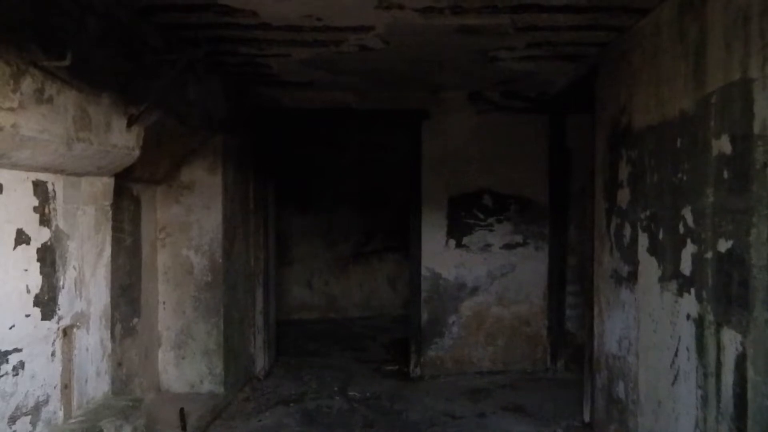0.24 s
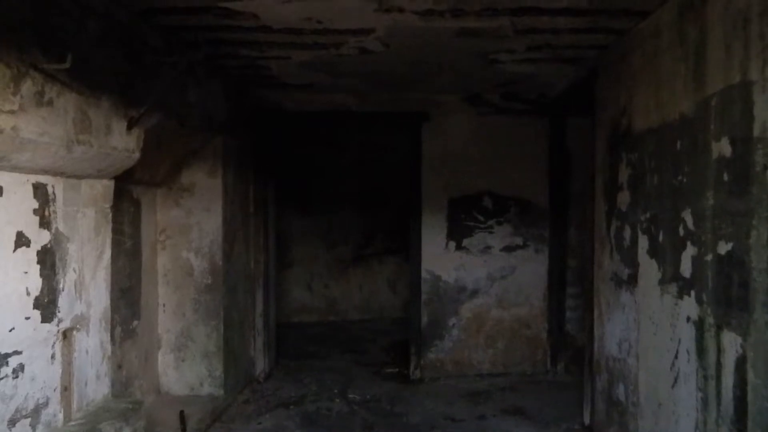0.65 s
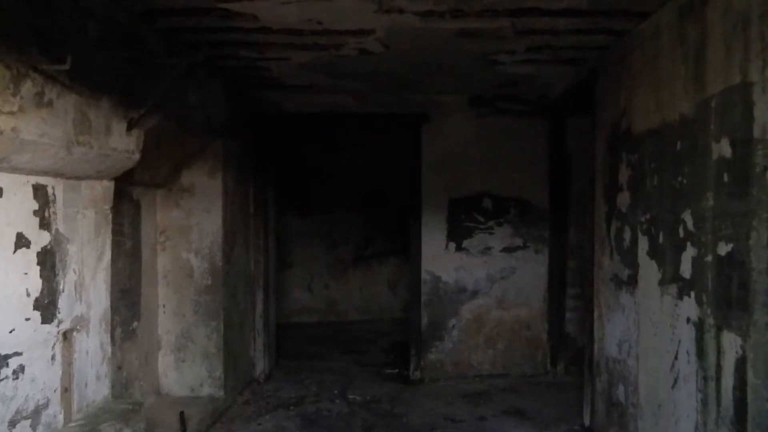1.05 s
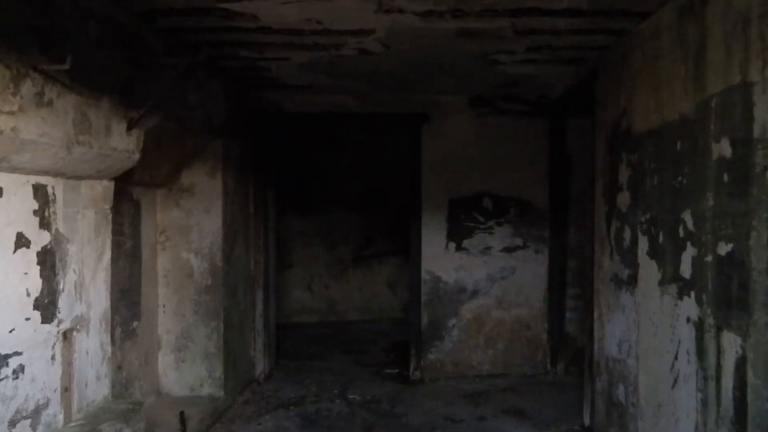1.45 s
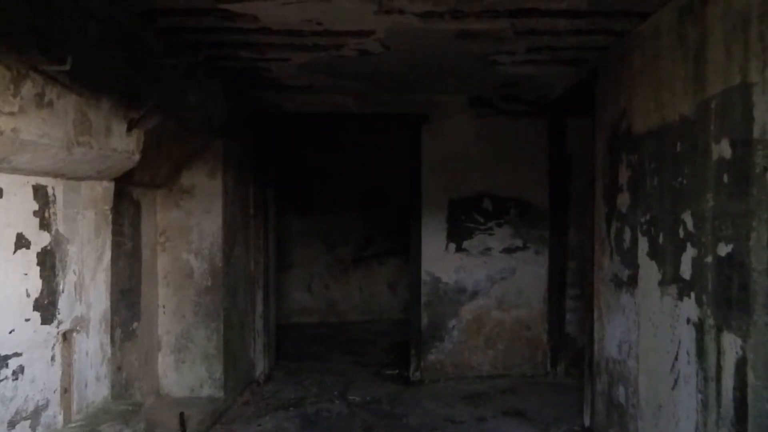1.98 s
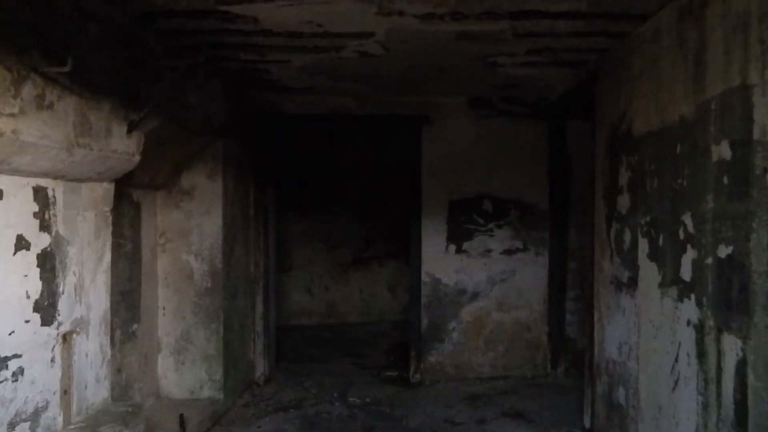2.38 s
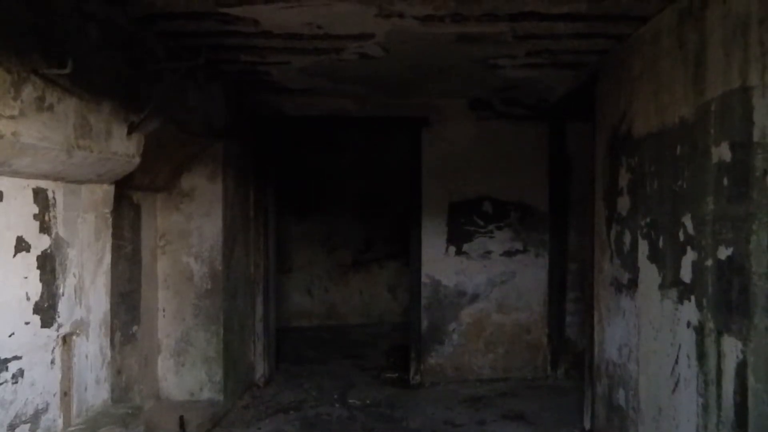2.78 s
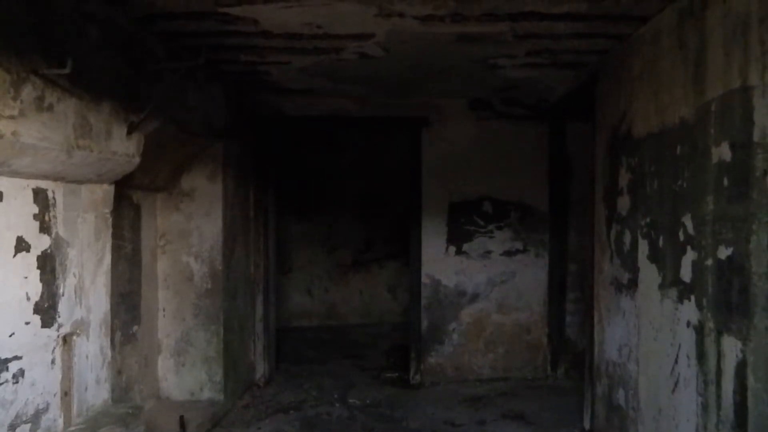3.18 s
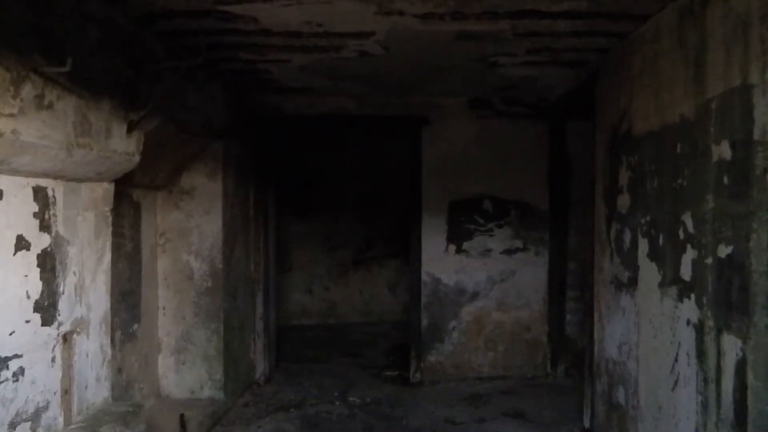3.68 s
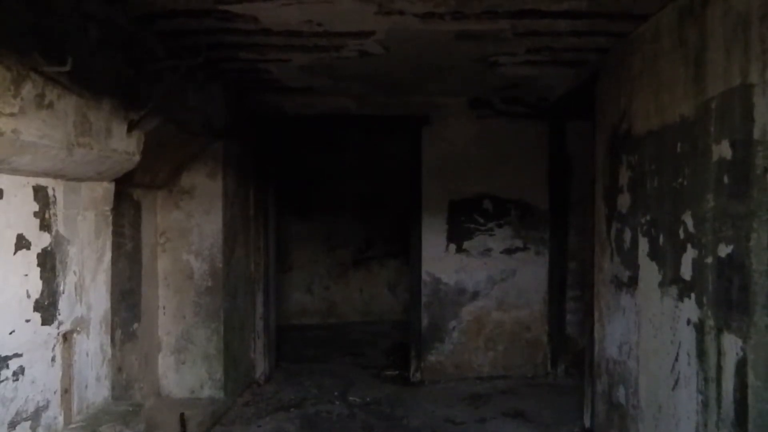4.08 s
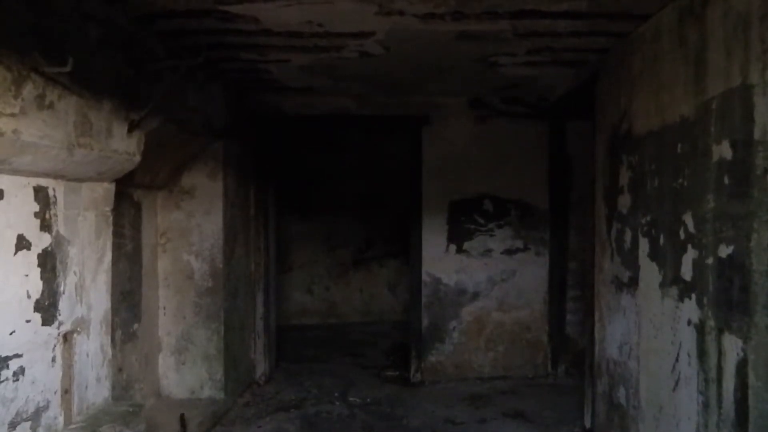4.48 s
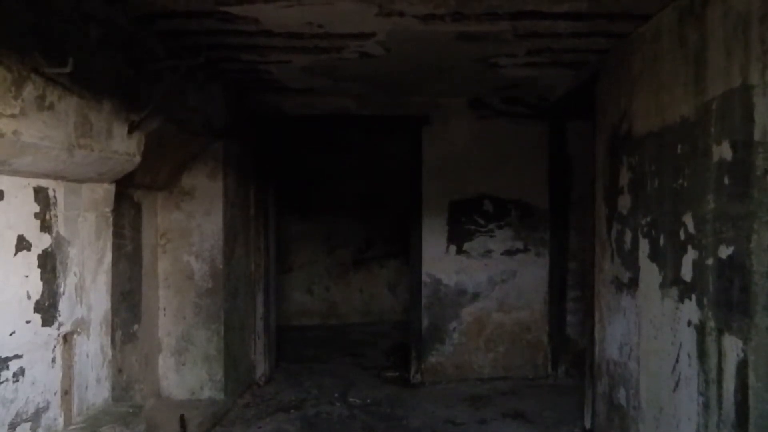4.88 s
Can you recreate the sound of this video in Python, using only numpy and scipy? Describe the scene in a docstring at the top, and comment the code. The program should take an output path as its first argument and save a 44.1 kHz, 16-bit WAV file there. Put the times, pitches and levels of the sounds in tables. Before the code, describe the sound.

Swallows squabble in harsh, raspy squawks inside an echoing concrete bunker, over a faint, distant engine hum.

```python
"""Inside a bare concrete bunker, swallows squabble. Each squawk is a raspy harmonic series from the two
sides of the syrinx, mixed with turbulent air and filtered by throat and beak; its pitch dips, then whips
upward. The walls add early reflections and a short reverberant ring. Wings flick now and then, there is
one soft scuff, and a far engine hums in the outdoor air."""
import sys
import numpy as np
from scipy import signal
from scipy.fft import rfft, irfft, next_fast_len
from scipy.io import wavfile
from scipy.ndimage import uniform_filter1d

SR = 44100
rng = np.random.default_rng(int(sys.argv[2]) if len(sys.argv) > 2 else 0)


def transcribe(u):
    """Save the signal u as a 16-bit wav file named by the first command-line argument.

    u: samples, shape (n,) or (channels, n), limited to [-1, 1]; the rate is SR.
    q: integer samples, one column per channel.
    """
    v = np.clip(np.atleast_2d(u).T, -1, 1)
    q = np.round(v * 32767).astype(np.int16)
    wavfile.write(sys.argv[1], SR, q)


N = 226612
TIME = np.arange(N) / SR
RUN_IN = SR // 2   # samples: the bunker is already ringing when the scene opens
CUTOFF_HZ = 15750
MIN_FFT_SIZE = 8192


def swallows(perches=3):
    """Superposition: the squawks come from the perches in turn and add up in one row for each."""
    # calls: peak_time_s, top_pitch_hz, rasp (0 to 1), level_db, gape_db, treble_db
    squawks = [(-.14, 1706, 0.37, -24.5, -1.5, -18), (.593, 1876, 0.62, -19, 0, -10),
               (.685, 1773, 0.26, -26, -13, -28), (.781, 1768, 0.65, -26.5, -13.5, -18),
               (.944, 1863, 0.22, -17, -5.5, -4), (1.039, 1682, 0.28, -18, -8.5, -12.5),
               (1.106, 1762, 0.52, -24, -13, -24), (1.198, 1740, 0.62, -24.5, -15, -31),
               (1.295, 1802, 0.56, -24, -17, -10), (1.41, 1844, 0.8, -26.5, -14, -28),
               (1.552, 1863, 0.73, -25, -19, -6), (1.663, 1812, 1, -23, -13, -34),
               (1.691, 1522, 0.62, -26, 2, -27), (1.766, 1812, 0.98, -24, -2.5, -10),
               (2.011, 2161, 0.21, -15.5, -10, 3.5), (2.11, 1942, .15, -18, -3, 0),
               (2.174, 1144, 0.4, -34, 21, 12), (2.422, 1742, 0.48, -21, -12, -12.5),
               (2.474, 1880, 0.19, -15.5, -7.5, -4.5), (2.498, 1702, 0.9, -21.5, -27, -17),
               (2.565, 1714, 0.33, -15.5, -9, -11.5), (2.829, 1546, 0.57, -19.5, -2.5, -19),
               (2.906, 1368, 0.82, -25.5, -1, -28), (3.169, 1647, 0.47, -21.5, -15.5, -20),
               (3.271, 1578, 0.47, -27.5, -9.5, -18), (3.524, 1540, .45, -19.5, -2, -22),
               (3.885, 1143, 0.49, -29.5, 11, -2), (4.011, 1656, 0.64, -25, -11.5, -13),
               (4.103, 1570, 0.37, -24.5, -11, -21), (4.168, 1694, 0.47, -16.5, -4, -21),
               (4.251, 1496, 0.35, -18.5, -4.5, -19), (4.578, 1683, .7, -13.5, -7.5, -9),
               (4.663, 1622, 0.28, -16, -10.5, -16), (4.685, 1518, 0.44, -21, -5.5, -13),
               (4.955, 1609, 0.47, -14.5, -4.5, -23), (5.056, 1216, 0.66, -26.5, 2, -9)]
    rows, last_s = np.zeros((perches, RUN_IN + N + SR)), -np.inf
    for k, (peak_s, top_hz, rasp, level_db, gape_db, treble_db) in enumerate(squawks):
        lead_s, call = articulate(peak_s - last_s, top_hz, rasp, gape_db, treble_db)
        start = RUN_IN + int((peak_s - lead_s) * SR)
        rows[k % perches, start:start + len(call)] += from_db(level_db) * call
        last_s = peak_s
    return rows[:, :RUN_IN + N]


def articulate(pause_s, top_hz, rasp, gape_db, treble_db, usual_top_hz=1700, usual_dip_hz=1322):
    """Covariation: a higher call scoops wider and longer; the pause sets its lead-in, the gape its tone."""
    # a call from rest swells slowly, one hard after another bursts in: pause_s, lead_s, level_db
    lead_ins = [(.025, .031, 3), (.08, .046, 0), (.12, .052, -2.5), (0.299, .059, -5.5)]
    pauses, leads, levels = np.transpose(lead_ins)
    height = top_hz / usual_top_hz
    lead_s = np.interp(pause_s, pauses, leads) * height ** 1.6
    lead_db = np.interp(pause_s, pauses, levels) + .25 * gape_db   # a nearly shut beak muffles it
    dip_hz = min(usual_dip_hz * height ** .5, .85 * top_hz)   # even the lowest grunt dips
    hiss_share = 1.62 * from_db(.2 * gape_db)   # a wider beak lets out more torn air
    return lead_s, squawk(lead_s, dip_hz, top_hz, rasp, lead_db, beak(gape_db, treble_db), hiss_share)


def squawk(lead_s, dip_hz, top_hz, rasp, lead_db, harmonics_db, hiss_share,
           whip_s=.03, release_s=.017, second_ratio=1.26, second_share=.67):
    """Biphonation: two voices and hiss sag in pitch, whip up to a clearer peak, then hook down."""
    t = np.arange(-lead_s, release_s, 1 / SR)
    rise_s = min(whip_s, .6505 * lead_s)
    glide_times = [-lead_s, -.5 * (lead_s + rise_s), -rise_s, -.58 * rise_s, -.1 * rise_s,
                   .2 * release_s, release_s]
    glide = np.interp(t, glide_times, [.562, .18, .05, .24, .94, 1, .9])
    pitch = dip_hz + (top_hz - dip_hz) * uniform_filter1d(glide, size=260, mode="nearest")
    effort_times = [-lead_s, -.72 * lead_s, -.55 * rise_s, -.1 * rise_s, .16 * release_s, release_s]
    effort_db = np.interp(t, effort_times, [lead_db - 13, lead_db - 8, lead_db + .49, 1, -2.5, -20])
    onset = np.minimum((t + lead_s) / .0051, 1)   # the air takes a moment to start
    harshness = rasp ** 1.09 * np.interp(t, [-lead_s, -rise_s, 0], [2.9, 1.6, .7])
    # the two lowest harmonics fill in as the throat swells; in a clear call they bloom in the dip
    lowest = np.arange(len(harmonics_db))[:, None] < 2
    bloom_db = 12 * max(1 - 2 * rasp, 0)
    fill_db = np.interp(t, [-lead_s, -.66 * lead_s, -.45 * rise_s], [-13, bloom_db, 0])
    colour_db = harmonics_db[:, None] + lowest * fill_db
    second_side = second_share * harshness * syrinx(pitch * second_ratio, 1.74 * rasp, colour_db)
    hiss = hiss_share * harshness * torn_air(len(t))
    first_side = syrinx(pitch, rasp, colour_db)
    power = 1 + (second_share ** 2 + hiss_share ** 2) * harshness ** 2
    return (first_side + second_side + hiss) / np.sqrt(power) * from_db(effort_db) * onset


def syrinx(pitch, rasp, harmonics_db, flutter=.0066, jitter=.0475, jitter_hz=420, shimmer_hz=280):
    """Quasi-periodic vibration: one side gives harmonics whose jitter and shimmer grow with the rasp."""
    size = len(pitch)
    unsteady_hz = pitch * (1 + (flutter + jitter * rasp) * wander(jitter_hz, size))
    phase = 2 * np.pi * np.cumsum(unsteady_hz) / SR
    order = 1 + np.arange(len(harmonics_db))[:, None]
    gains = from_db(harmonics_db) * (order * pitch < CUTOFF_HZ)
    stack = np.sum(gains * np.sin(order * phase + rng.uniform(0, 2 * np.pi, order.shape)), axis=0)
    shimmer_db = 4 * rasp * wander(shimmer_hz, size)
    return rms_one(stack * from_db(shimmer_db))


def torn_air(size, puff_hz=660):
    """Turbulence: air torn by the membranes gives broadband noise in slight, rapid puffs."""
    # turbulence spectrum: frequency_hz, density_db
    spectrum = [(1200, -20.5), (2500, -13.5), (3700, 1), (5100, -8), (6200, -3), (7600, -5.5),
                (10000, -18.5), (15000, -5)]
    return rms_one(coloured_noise(spectrum, size) * from_db(.59 * wander(puff_hz, size)))


def beak(gape_db, treble_db, slope_db=-2.5):
    """Resonance tracking: the beak stays tuned to harmonic 3; gives nine harmonics in dB against it."""
    upper_db = max(gape_db - 4.5, -10)   # harmonics 4 and 5 still pass a nearly shut beak
    first_five_db = [gape_db - 14, gape_db - 2, 0, upper_db - 4, upper_db - 3]
    return np.concatenate([first_five_db, treble_db + slope_db * np.arange(4)])


def throat(source):
    """Source-filter principle: the windpipe passes little below its first resonance and dulls the top."""
    # windpipe response: frequency_hz, gain_db
    response = [(1000, -16), (1400, -14.5), (1650, -12.5), (2100, -11.5), (2420, -6.5), (2750, 0),
                (3800, -0.5), (4700, -1.5), (5400, 2), (6500, -2.5), (7800, -6.5), (8600, -8.5),
                (11000, -14.5), (15500, -24.5)]
    padded = next_fast_len(len(source), True)
    gains = from_db(at_hz(response, np.fft.rfftfreq(padded, 1 / SR)))
    return irfft(rfft(source, padded) * gains, padded)[:len(source)]


def bunker(source, echo_db=1.0, echo_span_s=.035, echo_count=16, ring_db=-.5, build_up_s=.006):
    """Reverberation: direct sound, near-wall reflections, then a dense ring whose treble dies sooner."""
    # reverberation time by band: centre_hz, t60_s
    decays = [(300, 1), (1500, 0.76), (3000, 0.41), (5000, 0.44), (8000, 0.32), (15000, 0.24)]
    t, hz = TIME[:SR], np.fft.rfftfreq(SR, 1 / SR)
    white = rfft(rng.standard_normal(SR))
    centres_hz, t60s = np.transpose(decays)
    ring = np.zeros(SR)
    for share, t60_s in zip(np.eye(len(decays)), t60s):
        band = at_hz(np.column_stack([centres_hz, share]), hz)
        ring += irfft(white * band, SR) * np.exp(-np.log(1000) * t / t60_s)
    ring *= 1 - np.exp(-t / build_up_s)
    delays_s = (np.arange(echo_count) + rng.uniform(.3, 1, echo_count)) / echo_count * echo_span_s
    echoes = np.zeros(SR)
    # longer paths arrive weaker
    echoes[(delays_s * SR).astype(int)] = rng.choice([-1, 1], echo_count) / (delays_s + .0023)
    response = from_db(ring_db) * ring / np.linalg.norm(ring)
    response += from_db(echo_db) * echoes / np.linalg.norm(echoes)
    response[0] += 1   # direct sound
    return signal.fftconvolve(source, response)[:len(source)]


def wings():
    """Friction noise: feathers rub in brief, bright flicks."""
    # wing flicks: peak_time_s, level_db, width_s
    flicks = [(.146, -39, 0.0064), (.628, -29.5, 0.0049), (1.254, -35.5, 0.0059), (1.283, -34.5, 0.011),
              (4.556, -35.5, 0.023)]
    # feather spectrum: frequency_hz, density_db
    spectrum = [(500, -14), (2000, -7.5), (4000, 1.5), (7000, 6.5), (10000, -1), (15000, -9)]
    return swishes(flicks, spectrum)


def scuff():
    """Friction noise: one soft, low rub."""
    # the rub: peak_time_s, level_db, width_s
    rubs = [(4.345, -47.5, 0.051)]
    # its spectrum: frequency_hz, density_db
    spectrum = [(100, -10), (220, -9), (350, -5.5), (700, -20), (2000, -17), (15000, -31)]
    return swishes(rubs, spectrum)


def engine(sway=.006, sway_hz=1.5, throb_db=-.14, throb_hz=3.3):
    """Engine orders: low tones locked to one wandering speed, each wavering a little in level."""
    # tones of the far engine: frequency_hz, level_db
    orders = [(69.5, -57), (102, -87), (136.5, -47.5), (201, -73)]
    turning = np.cumsum(1 + sway * wander(sway_hz, N)) / SR
    return sum(from_db(db + throb_db * wander(throb_hz, N)) * np.sqrt(2) * np.sin(2 * np.pi * hz * turning)
               for hz, db in orders)


def outdoor_air(level_db=-48.5):
    """Ambient noise: a steady floor, strongest in the bass."""
    # outdoor spectrum: frequency_hz, density_db
    spectrum = [(25, -2), (45, 2), (58, -11), (80, -2), (120, -0.5), (160, -2.5), (230, -9.5), (390, -13),
                (600, -17.5), (1100, -20), (2200, -24.5), (5700, -24), (13000, -29.5), (15500, -35)]
    return from_db(level_db) * coloured_noise(spectrum)


def swishes(events, spectrum):
    """Amplitude modulation: Gaussian swells shape a rubbing noise."""
    swell = sum(from_db(db) * np.exp(-.5 * ((TIME - peak_s) / width_s) ** 2)
                for peak_s, db, width_s in events)
    return swell * coloured_noise(spectrum)


def coloured_noise(spectrum, size=N):
    """Spectral shaping: white noise takes on the given spectrum, at about unit power."""
    padded = next_fast_len(max(size, MIN_FFT_SIZE), True)
    gains = from_db(at_hz(spectrum, np.fft.rfftfreq(padded, 1 / SR)))
    return rms_one(irfft(rfft(rng.standard_normal(padded)) * gains, padded))[:size]


def wander(rate_hz, size):
    """Low-pass noise: a smooth random drift of about unit spread, up to about the given rate."""
    padded = next_fast_len(max(size, MIN_FFT_SIZE), True)
    gains = 1 / (1 + (np.fft.rfftfreq(padded, 1 / SR) / rate_hz) ** 4)
    return rms_one(irfft(rfft(rng.standard_normal(padded)) * gains, padded))[:size]


def at_hz(points, hz):
    """Interpolation of a spectrum on a log-frequency axis."""
    freqs, values = np.transpose(points)
    return np.interp(np.log(np.maximum(hz, 1)), np.log(freqs), values)


def from_db(db):
    """Decibels to amplitude ratio."""
    return 10 ** (np.asarray(db) / 20)


def rms_one(x):
    """Normalisation to unit power."""
    return x / np.sqrt(np.mean(x ** 2) + 1e-20)


def scene():
    """Superposition: birds and wings, each place with its own echoes, over a scuff and the outdoors."""
    calls = sum(bunker(throat(perch)) for perch in swallows())[RUN_IN:]
    flicks = bunker(wings())
    outside = engine() + outdoor_air()
    return (from_db(-1) * calls + from_db(-2) * flicks + scuff() + outside)[None]


def record(dry):
    """Band limiting: an elliptic low-pass cuts the top steeply."""
    return signal.sosfilt(signal.ellip(12, .1, 90, CUTOFF_HZ, fs=SR, output="sos"), dry)


dry = scene()
out = record(dry)
transcribe(out)
```